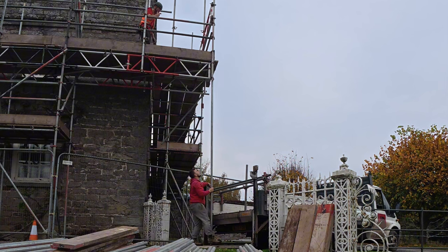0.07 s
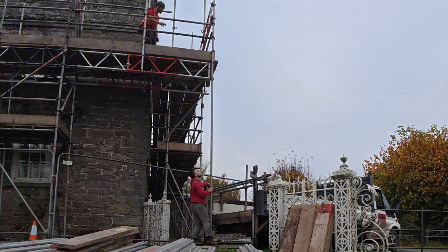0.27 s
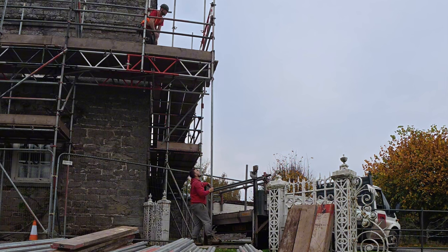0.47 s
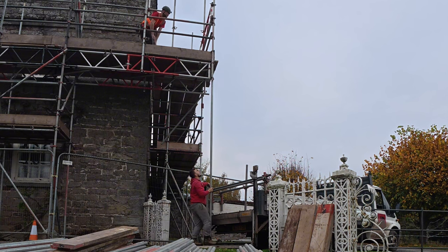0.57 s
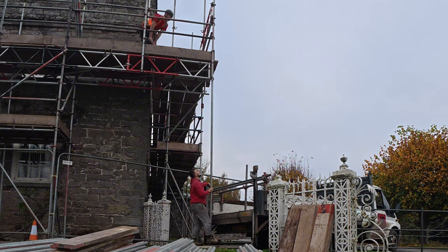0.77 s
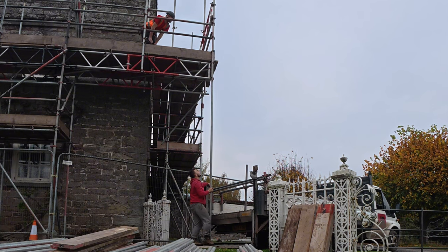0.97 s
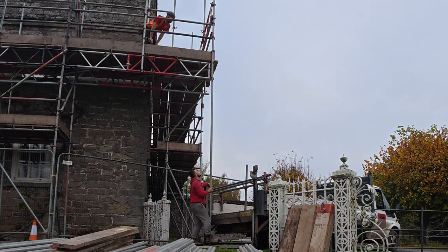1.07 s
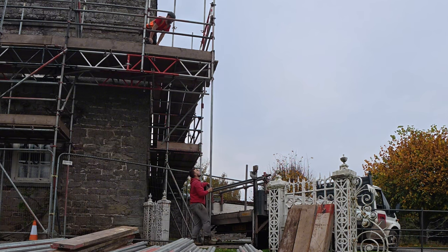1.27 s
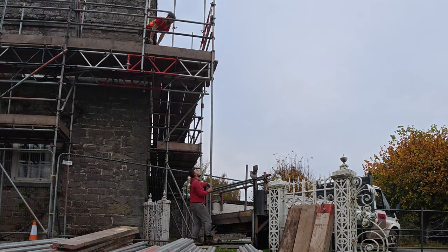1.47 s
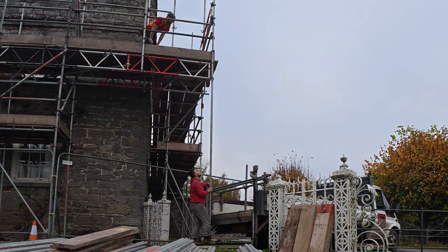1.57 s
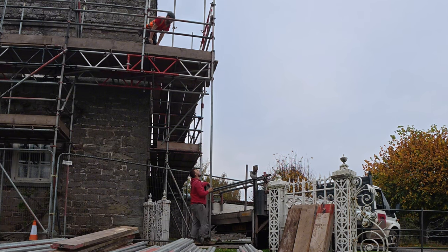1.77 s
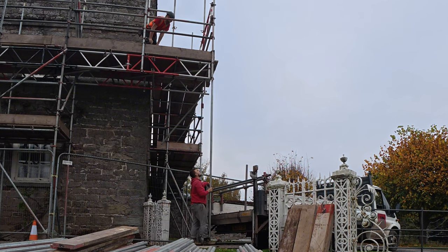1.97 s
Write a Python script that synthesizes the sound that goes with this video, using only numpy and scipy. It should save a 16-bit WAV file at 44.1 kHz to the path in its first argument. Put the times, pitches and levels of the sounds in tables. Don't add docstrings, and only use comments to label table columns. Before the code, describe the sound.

Irregular metal hammering on scaffolding outdoors, each hit a sharp tick, heavy knock and loose clatter of tubes and boards with a brief high ring; then near quiet, a tiny far tap, low distant hum, mono.

```python
import sys
import numpy as np
from scipy import signal
from scipy.fft import rfft, irfft
from scipy.io import wavfile
from scipy.ndimage import uniform_filter1d

SR = 44100
rng = np.random.default_rng(int(sys.argv[2]) if len(sys.argv) > 2 else 0)


def magnitude_from_level(level_db):
    exponent = np.asarray(level_db, float) / 20
    return 10 ** exponent


def persist_wave(psi):
    counts = np.round(np.clip(psi, -1, 1) * 32767).astype(np.int16)
    wavfile.write(sys.argv[1], SR, np.atleast_2d(counts).T)


N = 88420
SPAN = 2 ** 15


def curve(table, hz):
    table = np.array(table, float)
    return np.interp(np.log(np.maximum(hz, 1)), np.log(table[:, 0]), table[:, 1])


def unit(x):
    return x / np.sqrt(np.sum(x ** 2))


def fade(t, t60):
    return magnitude_from_level(-60 * t / t60)


def add(out, x, s):
    i = int(round(s * SR))
    a, b = max(i, 0), min(i + len(x), len(out))
    out[a:b] += x[a - i:b - i]


def contacts():
    # (t/s, level/dB, tilt/dB per
    # octave, contact length/s, tube ring/dB)
    blow_contacts = [
        (-.06, -33.5, -8, 0.017, 10),
        (-.06, -33, 3.5, 0.0086, -1.5),
        (.075, -60.5, -1, 0.026, -2.5),
        (0.111, -54.5, -4.5, 0.03, -6),
        (0.265, -65, -3, 0.017, -18.5),
        (0.2918, -29.5, 4, 0.025, -1.5),
        (0.317, -20, 0, 0.0059, -2),
        (0.453, -47, -7.5, 0.022, 2),
        (0.4822, -51, 0, 0.019, -4.5),
        (0.531, -65.5, 1.5, 0.035, -2),
                     (0.608, -28, 6, 0.02, -20), (0.6193, -18.5, -2, 0.0042, 5),
                  (0.637, -26.5, -4, 0.032, -29.5), (0.755, -34.5, -3.5, 0.012, -21),
                  (0.771, -38, -1.5, 0.0061, 6.5), (0.796, -41, -2, 0.018, -0.5),
                  (0.947, -24, -3, 0.012, -21.5), (0.956, -22, 0, 0.012, -5.5),
                  (0.9633, -13.5, 0.3, 0.011, 3.5), (1.006, -26.5, -2, 0.029, 4),
                  (1.077, -32, -2.5, 0.012, -2.5), (1.093, -33.5, -1.5, 0.0099, -13.5),
                  (1.313, -39, -5.5, 0.0062, -12), (1.3179, -29, 4.5, 0.0068, -6),
                  (1.3348, -17, 1.37, 0.0098, 5), (1.359, -22, 0, 0.014, 3), (1.402, -29.5, -1.5, .02, -32),
                  (1.451, -53, 2, 0.019, -10), (1.512, -72.5, -6, .02, 12), (1.63, -55, -4.5, 0.022, -22.5),
                  (1.674, -58, -5.5, 0.013, -24)]
    boards_db, tube_db = -4, -10
    soft_cut_hz, soft_below_db, soft_cut_db_per_db = 7900, -27, 1.2

    out = np.zeros(N)
    tube, boards = mode_bank(tube_modes()), mode_bank(board_modes())
    share, fades = frame_bands()
    hz = np.arange(SPAN + 1) * SR / (2 * SPAN)
    octaves = np.log2(np.clip(hz, 220, 16000) / 1000)
    above_cut = 1 / (1 + (soft_cut_hz / (hz + 1)) ** 20)
    t = np.arange(4096) / SR
    for s, db, tilt_db, length, ring_db in blow_contacts:
        pressure = np.sin(np.pi * np.clip(t / length, 0, 1) ** .6)
        push = rfft(unit(rng.standard_normal(len(t)) * pressure), 2 * SPAN)
        push = push / np.sqrt(uniform_filter1d(np.abs(push) ** 2, size=401))

        body = clatter(share, fades) + magnitude_from_level(boards_db) * strike(boards)
        spectrum = rfft(body, 2 * SPAN) * magnitude_from_level(tilt_db * octaves)
        spectrum = spectrum + magnitude_from_level(tube_db + ring_db) * rfft(strike(tube), 2 * SPAN)
        softness_db = min(db - soft_below_db, 0)
        spectrum = spectrum * magnitude_from_level(soft_cut_db_per_db * softness_db * above_cut)
        add(out, 40 * magnitude_from_level(db) * irfft(spectrum * push)[:SPAN], s)
    return out


def clatter(share, fades):
    bands = irfft(rfft(rng.standard_normal(SPAN)) * share)
    return unit(np.sum(bands * fades, axis=0))


def frame_bands():
    # (f/Hz, level/dB per Hz)
    frame_colour = [(60, -13), (220, -1.5), (1300, -4.5), (3200, -10), (4500, -8.5), (7400, -11),
                    (8600, -19.5), (16000, -37.5)]
    # (f/Hz, t60/s)
    frame_decay = [(60, 0.5), (210, 0.44), (560, 0.31), (1470, 0.18), (3880, 0.2), (7000, 0.11),
                   (10200, 0.052), (15000, 0.24)]
    echo_db, echo_stretch, top_t60_s = -32.5, 2.2, .085

    t, hz = np.arange(SPAN) / SR, np.arange(SPAN // 2 + 1) * SR / SPAN
    octave = np.arange(6, 15)[:, None]
    t60 = curve(frame_decay, 2. ** octave)
    t60[-1] = np.minimum(t60[-1], top_t60_s)
    overlap = np.clip(1 - np.abs(np.log2(np.maximum(hz, 64)) - octave), 0, 1)
    share = overlap * magnitude_from_level(curve(frame_colour, hz))
    return share, fade(t, t60) + magnitude_from_level(echo_db) * fade(t, t60 * echo_stretch)


def board_modes(count=3):
    # (f/Hz, level/dB, t60/s)
    board_notes = [(127, -13, 0.56), (167.7, -13, 0.34), (219.2, 3, 0.39), (251.2, -2, 0.32),
                   (378.5, -9.5, 0.47), (412.4, -11, 0.58), (601, 4, 0.17), (622.5, -3, 0.56),
                   (907, -6, 0.12), (1056.6, -1.5, 0.23), (1163, -13, 0.31), (1376, 6.5, 0.043),
                   (1360, -14, 0.13), (88, -38, 0.85)]
    split, longest_t60_s = .035, .3
    rows = []
    for hz, db, t60 in board_notes:
        for _ in range(count):
            detuned_hz = hz * (1 + split * rng.standard_normal())
            rows.append((detuned_hz, db, min(t60, longest_t60_s)))
    return rows


def tube_modes(count=22):
    # (hoop f/Hz, spread/Hz, level/dB, t60 at the edge/s, t60 at the top/s)
    families = [
        (3462, 150, -5, .42, .36),
        (3520, 750, 0, .34, .25),
        (9600, 550, -12, .15, .1),
        (4900, 2700, -8, .15, .15),
    ]
    rows = []
    for hz, spread_hz, db, t60_edge, t60_top in families:
        place = (np.arange(count) + rng.random(count)) / count
        mode_hz = hz + spread_hz * place ** 1.2
        t60 = t60_edge * (t60_top / t60_edge) ** place
        rows += list(zip(mode_hz, db - 4 * place, t60))
    return rows


def mode_bank(table):
    hz, db, t60 = np.array(table, float).T[:, :, None]
    t = np.arange(SPAN) / SR
    return magnitude_from_level(db) * fade(t, t60) * np.exp(2j * np.pi * hz * t).astype(np.complex64)


def strike(bank):
    count, scatter_db = len(bank), 6
    strength = magnitude_from_level(scatter_db * rng.standard_normal(count))
    gain = strength * np.exp(2j * np.pi * rng.random(count))
    return unit((gain @ bank).imag)


def ping(db, hz, t60):
    t = np.arange(16384) / SR
    rise = np.clip(t / (.0004 + .01 * t60), 0, 1) ** 2
    return magnitude_from_level(db) * rise * fade(t, t60) * np.sin(2 * np.pi * hz * t)


def pings(table):
    out = np.zeros(N)
    for s, db, hz, t60 in table:
        add(out, ping(db, hz, t60), s)
    return out


def ticks():
    # (t/s, peak/dB, f/Hz, t60/s)
    clicks = [(0.299, -15, 10300, 0.0093), (0.3198, -11.5, 1410, 0.015), (0.31, -12, 1950, 0.012),
              (.6084, 14, 7200, 0.0016), (.6086, -23, 5100, 0.0035), (.6122, -18, 6760, .012),
              (.6212, -6.5, 5000, 0.019), (.7723, -36.5, 7050, 0.03), (.7723, -20.5, 1330, 0.042),
              (.7723, -27.5, 2090, 0.018), (.7895, -20, 1200, 0.012), (1.0773, -21.5, 1403, .015),
              (1.0977, -19.5, 1170, 0.016), (1.099, -49, 6700, 0.018), (.9635, -38.5, 8740, .01),
              (1.3181, 1, 7010, 0.0035), (1.3183, -9, 8520, 0.0053), (1.3355, -6.5, 5300, 0.0093)]
    return pings(clicks)


def hoop_notes():
    # (t/s, peak/dB, f/Hz, t60/s)
    notes = [(-.02, -40, 3462, .25), (-.02, -28.5, 3585, .2), (-.01, -52, 9940, .1),
             (.074, -66, 10100, .05), (.325, -25, 3520, 0.22), (.297, -30.5, 3600, 0.1),
             (.385, -40.5, 3490, 0.3), (.322, -15, 5180, 0.029), (.455, -52, 3520, .2),
             (.482, -57.5, 6460, .08), (0.48, -58, 5450, .15), (.613, -19, 9800, .05),
             (0.642, -33, 9860, .12), (.63, -36, 3520, .4), (.975, -31.5, 3497, .5), (.975, -34, 3610, .3),
             (1.036, -40, 3560, .15), (1.082, -43, 4520, .08), (1.088, -49, 4280, .1),
             (1.089, -34, 3020, .06), (1.35, -28, 3610, 0.13), (1.49, -41, 3470, 0.32),
             (1.725, -56, 1250, 0.032), (1.968, -59.5, 1395, 0.021), (1.968, -53, 600, .03)]
    return pings(notes)


def rings():
    # (t/s, f/Hz)
    ring_starts = [(.002, 130), (.296, 130), (.296, 380), (.311, 2016), (.35, 5880), (.62, 1400),
                   (.62, 590), (.625, 1211), (.636, 217), (.758, 220), (.776, 2016), (.483, 6850),
                   (.777, 3800), (.793, 3950), (.97, 9750), (.33, 9800), (.79, 7250), (.946, 190),
                   (.964, 1150), (.969, 900), (.965, 590), (1.01, 242), (1.095, 1800), (1.32, 140),
                   (1.322, 9900), (1.337, 2000), (1.395, 590), (.6084, 14300), (.6098, 11200),
                   (1.3181, 14200), (1.323, 13700), (1.32, 11000), (.9635, 8800), (1.457, 8200),
                   (1.457, 10500), (1.458, 3700), (.43, 2016)]
    # (peak/dB, t60/s)
    ring_shapes = [(-48, 0.088), (-24, 0.11), (-24.5, 0.11), (-34.5, 0.23), (-31, 0.14), (-12, 0.046),
                   (-26, 0.24), (-20.5, 0.21), (-25.5, 0.059), (-30.5, 0.1), (-39, 0.31), (-60, 0.22),
                   (-33.5, 0.039), (-33.5, 0.099), (-38, 0.13), (-29.5, 0.071), (-55.5, .15), (-16, 0.024),
                   (-12.5, .03), (-11, 0.032), (-27, .12), (-25.5, 0.21), (-26, 0.047), (-22.5, 0.079),
                   (-17, 0.033), (-13, .04), (-19.5, 0.18), (-14.5, .004), (-12, .008), (-15.5, .004),
                   (-28, 0.011), (-19.5, .008), (-37, 0.0075), (-49, 0.012), (-51, 0.012), (-39, 0.017),
                   (-54.5, .3)]
    pair_hz = 22.6
    out = np.zeros(N)
    for (s, hz), (db, t60) in zip(ring_starts, ring_shapes):
        partner = ping(db - 0.5, hz + pair_hz, 0.2 * t60)
        add(out, ping(db, hz, t60) + partner, s)
    return out


def sweeps():
    # (t/s, peak/dB)
    slides = [
        (0.29, -57),
        (.321, -29),
        (.6145, -8),
        (.962, -33.5),
        (1.3305, -2),
        (1.313, -25.5),
    ]
    hoop_hz, travel_s, t60_s, rise_s = 3480, .005, .06, .004
    out, t = np.zeros(N), np.arange(8192) / SR
    late = np.maximum(t - travel_s, 0)
    phase = 2 * np.pi * hoop_hz * np.sqrt(late * (late + 2 * travel_s))
    rise = np.clip(late / rise_s, 0, 1) ** 2
    slide = rise * fade(late, t60_s) * np.sin(phase)
    for s, db in slides:
        add(out, magnitude_from_level(db) * slide, s)
    return out


def far_tap():
    # (t/s, peak/dB, f/Hz, t60/s)
    tap_modes = [
        (1.905, -51, 2080, .025),
        (1.906, -57, 3180, .017),
        (1.907, -61, 4770, .011),
        (1.908, -60, 3650, .016),
        (1.907, -66, 6500, .007),
        (1.637, -54, 1300, .03),
    ]
    return pings(tap_modes)


def site():
    # (f/Hz, level/dB per Hz)
    hum_colour = [(15, -62), (25, -35), (92, 5.5), (127, -29.5), (166, -6.5), (1650, -19.5), (2160, -30.5),
                  (2350, -29), (16000, -51.5)]
    level_db, swell_db = -58, 0.84
    hz = np.arange(N // 2 + 1) * SR / N
    noise = rfft(rng.standard_normal(N))
    hum = unit(irfft(noise * magnitude_from_level(curve(hum_colour, hz)), N)) * np.sqrt(N)
    swell = np.interp(np.arange(N), np.linspace(0, N, 24), rng.standard_normal(24))
    return hum * magnitude_from_level(level_db + swell_db * swell)


def scene():
    blows = contacts() + ticks()
    ringing = hoop_notes() + rings() + sweeps()
    return (blows + ringing + far_tap() + site())[None]


def band_limit(x):
    return signal.sosfilt(signal.butter(12, 16450, fs=SR, output="sos"), x)


def record(dry):
    low_hz, dull_hz, top_hz = 67.2, 12000, 15900
    dry = signal.sosfilt(signal.butter(4, low_hz, "high", fs=SR, output="sos"), dry)
    dry = signal.sosfilt(signal.butter(2, dull_hz, fs=SR, output="sos"), dry)
    squeezed = np.tanh(dry / 1.174) * 1.044
    top = signal.ellip(8, .2, 60, top_hz, fs=SR, output="sos")
    return band_limit(signal.sosfilt(top, squeezed))


dry = scene()
out = record(dry)
persist_wave(out)
```